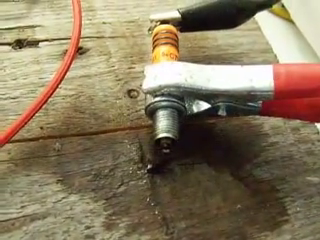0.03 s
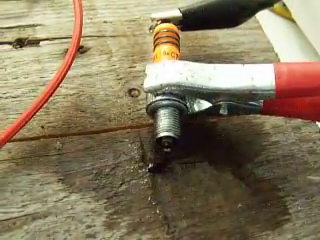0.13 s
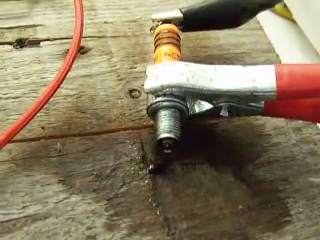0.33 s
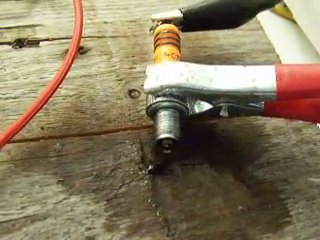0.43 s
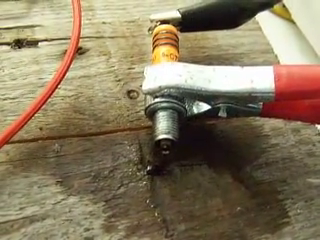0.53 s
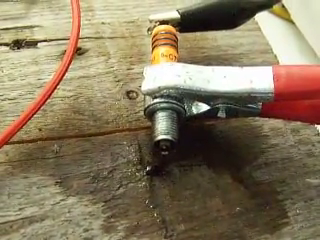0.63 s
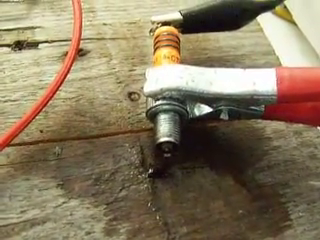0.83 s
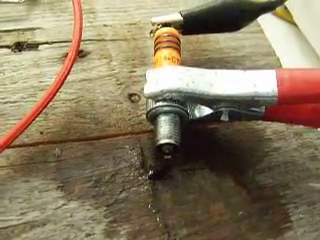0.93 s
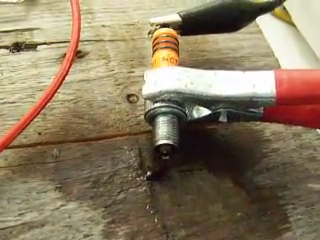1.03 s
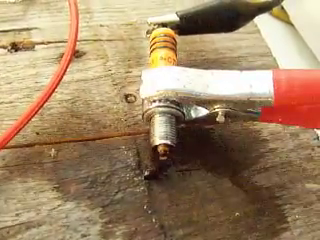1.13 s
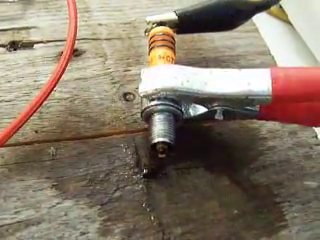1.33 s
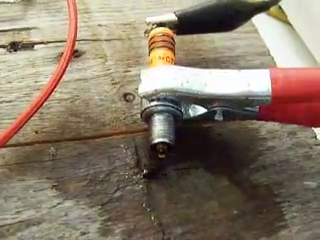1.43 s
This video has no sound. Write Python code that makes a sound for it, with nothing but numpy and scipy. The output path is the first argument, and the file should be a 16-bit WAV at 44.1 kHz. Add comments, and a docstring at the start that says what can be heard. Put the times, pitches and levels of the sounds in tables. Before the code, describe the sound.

Sharp electric sparks crack from a nearby spark plug on a wooden bench. The first comes with a booming, slightly overloaded pop, a weak one follows quickly, and a third comes after a pause. Soft hiss fills the small room.

```python
"""Hiss and rumble fill a small room. At 0.22 s a spark plug clamped on a wooden bench fires: one sharp
pulse with near echoes, ringing briefly in the two microphone ports. With it comes a dull pop, perhaps fuel
vapour catching, which booms in the room, overloads the recorder and makes it turn its gain down.
A weaker spark follows at 0.42 s, a faint far tone swells and fades, and a third spark fires at 0.99 s."""
import sys
import numpy as np
from scipy import signal
from scipy.fft import rfft, irfft
from scipy.io import wavfile

SR = 44100
rng = np.random.default_rng(int(sys.argv[2]) if len(sys.argv) > 2 else 0)


def bounce(signal):
    """Save signal as a 16-bit WAV file at the path given by the first command-line argument."""
    frames = np.transpose(np.atleast_2d(signal))
    limited = np.clip(frames, -1, 1)
    pcm = np.round(limited * 32767).astype(np.int16)
    wavfile.write(sys.argv[1], SR, pcm)


N = 66150
TIME = np.arange(N) / SR

# the three sparks: (time [s], snap level [dB], left over right [dB], room level [dB], knock level [dB])
FIRINGS = [(0.2245, 4, -5, -29, 5), (0.4212, -7.5, 6, -44, 0.5), (0.994, -2, -1, -38.5, 1.5)]
# the notes of each microphone opening: (pitch [Hz], level [dB], time to fade by 60 dB [s])
LEFT_PORT_NOTES = [(1500, -29.5, 0.0023), (2590, -19, 0.0068), (4450, -7, 0.0043), (5556, 3, 0.0035),
                   (6150, 1.5, 0.0085), (7290, -15, 0.0066)]
RIGHT_PORT_NOTES = [(1450, -42, 0.0017), (2460, -15.5, 0.0035), (2940, -13.5, .004), (3750, -9.5, .005),
                    (4583, -2, 0.0045), (5190, -0.5, 0.0093), (5950, -9, 0.018)]
# the direct pulse and its echoes off nearby surfaces: (delay [s], level [dB])
ECHOES = [(0, -1), (.0013, 0.5), (.00273, -10), (.0036, -14.5), (.0051, -11)]
# the notes of the wooden bench: (pitch [Hz], level [dB], fade time [s])
BENCH_NOTES = [(173, -44, 0.21), (314, -36.5, 0.065), (595, -46, 0.013), (1300, -43, .012),
               (1623, -39.5, .012)]
# tone colour of the room's answer to a spark: (frequency [Hz], relative level [dB])
TAIL_COLOUR = [(300, -2), (1000, -29), (2000, -15.5), (3000, -11.5), (4000, -12.5), (5200, -2),
               (6200, -6.5), (6900, -15), (8100, -24), (8700, -45)]

def sparks():
    """Each spark rings the microphone ports, echoes, knocks the bench and leaves a bright room tail."""
    soften = signal.butter(2, 7800, fs=SR, output="sos")  # dulls the treble above 7800 Hz
    out = 0
    for start, snap_db, pan_db, room_db, knock_db in FIRINGS:
        left = ring(start, LEFT_PORT_NOTES, alternate=True)
        right = ring(start, RIGHT_PORT_NOTES, alternate=True)
        pulse = signal.sosfilt(soften, [left, right])
        snap = sum(from_db(db) * delayed(pulse, delay) for delay, db in ECHOES)
        knock = from_db(knock_db) * ring(start, BENCH_NOTES)
        tail = from_db(room_db) * rise_and_fade(start, rise_s=0.00084, fade_s=0.47) * noise(TAIL_COLOUR)
        out = out + from_db(snap_db) * pan(pan_db) * snap + knock + tail
    return out


# the notes of the pop's crack, and of the room it sets ringing: (pitch [Hz], level [dB], fade time [s])
CRACK_NOTES = [(186, -8, 0.049), (972, -17, 0.035), (1409, -14.5, 0.036), (1777, -17, 0.05),
               (2533, -6.5, 0.011), (3280, -14.5, 0.014)]
ROOM_NOTES = [(80.4, -9.5, 0.32), (101.1, -14.5, .3), (157, -21, 0.51), (168.1, -24, 0.73),
              (208.6, -21, 0.47), (239, -23.5, 0.66), (377.7, -31.5, 0.52), (475.6, -31.5, 0.37),
              (571, -34.5, 0.49), (780, -36.5, .35), (951, -33.5, 0.11)]
# tone colours of the first burst and the boom after it: (frequency [Hz], relative level [dB])
BURST_COLOUR = [(130, -14), (220, -5.5), (450, -1.5), (650, -4.5), (950, 0.5), (1150, -9), (1500, -3),
                (2500, -12.5), (4000, -9), (8000, -25)]
BOOM_COLOUR = [(60, -30.5), (100, -7.5), (200, 1), (300, -5), (500, -11), (900, -20.5), (1300, -23.5),
               (2500, -40.5)]

def pop(start=0.2249, build_up_s=0.0035, low_cut_hz=63.7):
    """A pressure front cracks with a short burst, then the room's low notes and boom build up and die."""
    crack = ring(start, CRACK_NOTES, alternate=True)
    burst = from_db(-7.5) * rise_and_fade(start, rise_s=0.00069, fade_s=0.041) * noise(BURST_COLOUR)
    boom = from_db(-21.5) * rise_and_fade(start, rise_s=0.0016, fade_s=0.52) * noise(BOOM_COLOUR)
    build_up = 1 - np.exp(-np.maximum(TIME - start, 0) / build_up_s)
    room_ring = pan(db=2.1) * build_up * ring(start, ROOM_NOTES)
    low_cut = signal.butter(4, low_cut_hz, "high", fs=SR, output="sos")
    return signal.sosfilt(low_cut, crack + burst + boom + room_ring)


# tone colours of the three background noises: (frequency [Hz], relative level [dB])
RUMBLE_COLOUR = [(20, -15), (32, -13.5), (46, -2), (65, -14.5), (100, -19.5), (200, -42.5)]
ROOM_COLOUR = [(60, -4.5), (100, 2), (160, -1), (240, -2), (320, -7.5), (420, -8.5), (600, -11.5),
               (1000, -13.5), (2000, -29)]
HISS_COLOUR = [(500, -18.5), (1400, -4.5), (2500, -5), (3600, -5.5), (5000, 1.5), (6100, 0), (7000, -10.5),
               (8100, -22.5), (8700, -49.5)]
# how the rumble and the hiss drift in loudness: (time [s], level [dB])
RUMBLE_DRIFT = [(0, -50.5), (.2, -47), (.4, -39), (.75, -47), (1.1, -41), (1.5, -44.5)]
HISS_DRIFT = [(0, -53), (.22, -53), (.62, -52.5), (.87, -54.5), (.94, -50.5), (1.02, -54), (1.39, -53),
              (1.47, -49.5), (1.5, -51.5)]

def background():
    """A deep rumble and a bright hiss drift gently over the room's steady low murmur."""
    rumble = from_db(np.interp(TIME, *np.transpose(RUMBLE_DRIFT))) * noise(RUMBLE_COLOUR)
    hiss = from_db(np.interp(TIME, *np.transpose(HISS_DRIFT))) * noise(HISS_COLOUR)
    murmur = from_db(-49.5) * noise(ROOM_COLOUR)
    return rumble + murmur + hiss


def far_tone(start=0.76, length_s=0.14, hz=990, width_hz=260):
    """A narrow band of noise swells and fades, heard as a faint tone far away."""
    swell = np.sin(np.pi * np.clip((TIME - start) / length_s, 0, 1))
    colour = [(hz - width_hz, -20), (hz, 0), (hz + width_hz, -20), (2 * hz, -50)]
    return from_db(-57) * swell * noise(colour)


# how alike the two channels are: (frequency [Hz], likeness [1 = the same, 0 = unrelated])
STEREO_LIKENESS = [(60, 0.9), (250, .9), (470, .82), (800, 0.57), (1400, 0.5), (2300, 0.025), (6000, 0.16)]
# which side is louder: (frequency [Hz], left over right [dB])
STEREO_BALANCE = [(80, 2.5), (300, 0), (1300, 1.5), (2300, -2), (3800, -4.5), (4800, -6), (6200, 11.5),
                  (7500, 1.5)]

def noise(colour):
    """Stereo noise of a given tone colour, alike on both sides in the bass, with a strength (rms) of 1."""
    hz = np.fft.rfftfreq(N, 1 / SR)
    shared, opposed = rfft(rng.standard_normal((2, N)))
    alike = at_hz(STEREO_LIKENESS, hz)
    stereo = np.sqrt(1 + alike) * shared + np.sqrt(1 - alike) * opposed * np.array([[1], [-1]])
    bass_fade = hz / (hz + colour[0][0] / 2)
    treble_fade = 1 / (1 + (hz / (2 * colour[-1][0])) ** 2)
    shape = from_db(at_hz(colour, hz)) * bass_fade * treble_fade
    out = irfft(stereo * shape * pan(at_hz(STEREO_BALANCE, hz)), N)
    return out / np.sqrt(np.mean(out ** 2))


def ring(start, notes, alternate=False):
    """Fading pure tones set off by one pulse; `alternate` flips every second one upside down."""
    age = np.maximum(TIME - start, 0)
    out = 0
    for k, (hz, db, fade_s) in enumerate(notes):
        sign = (-1) ** k if alternate else 1
        fade = np.exp(-np.log(1000) * age / fade_s)
        out = out + sign * from_db(db) * np.sin(2 * np.pi * hz * age) * fade
    return out


def rise_and_fade(start, rise_s, fade_s):
    """A loudness curve that rises quickly, then falls 60 dB every `fade_s` seconds."""
    age = np.maximum(TIME - start, 0)
    return (1 - np.exp(-age / rise_s)) * np.exp(-np.log(1000) * age / fade_s)


def delayed(stereo, seconds):
    """The same sound arriving later."""
    return np.array([np.interp(TIME - seconds, TIME, channel) for channel in stereo])


def from_db(db):
    """Turn decibels into a number to multiply by."""
    return 10 ** (np.asarray(db) / 20)


def at_hz(table, hz):
    """Read between a table's rows, giving every octave equal space."""
    row_hz, value = np.transpose(table)
    return np.interp(np.log(hz + 1e-9), np.log(row_hz), value)


def pan(db):
    """Two gains that make the left side `db` decibels louder than the right."""
    return from_db(np.array([[.5], [-.5]]) * db)


def scene():
    """The sparks and the pop over the background."""
    return sparks() + pop() + background() + far_tone()


def gain_control(sound, boost_db=13, threshold_db=-22, react_s=0.00068, recover_db_per_s=3.5):
    """The recorder boosts quiet sound; a loud peak quickly removes the boost, which returns slowly."""
    peak_db = 20 * np.log10(np.abs(sound).max(axis=0) + 1e-9)
    recovery_db = recover_db_per_s * TIME
    held_db = np.maximum.accumulate(peak_db + recovery_db) - recovery_db  # each peak sinks away slowly
    wanted_cut_db = np.clip(held_db - threshold_db, 0, boost_db)
    lag = np.exp(-1 / (react_s * SR))
    cut_db = signal.lfilter([1 - lag], [1, -lag], wanted_cut_db)
    return sound * from_db(boost_db - cut_db)


def record(dry):
    """The microphone misses high treble; the recorder sets its gain, clips peaks and rounds them off."""
    mic_top_hz, round_off_hz, top_cut_hz = 8450, 12500, 15500
    heard = signal.sosfilt(signal.ellip(8, .3, 80, mic_top_hz, fs=SR, output="sos"), dry)
    clipped = np.clip(gain_control(heard), -1, 1)
    rounded = signal.sosfilt(signal.butter(1, round_off_hz, fs=SR, output="sos"), clipped)
    return signal.sosfilt(signal.butter(16, top_cut_hz, fs=SR, output="sos"), rounded)


dry = scene()
out = record(dry)
bounce(out)
```